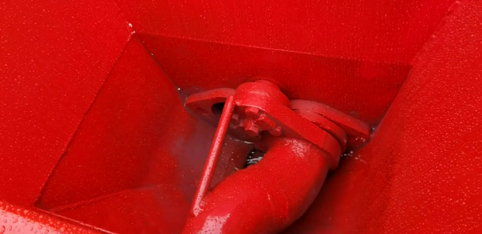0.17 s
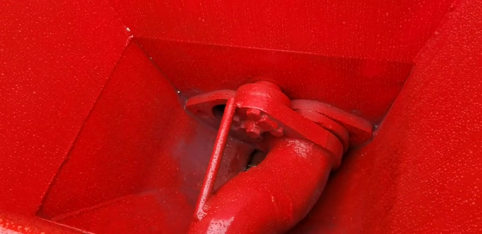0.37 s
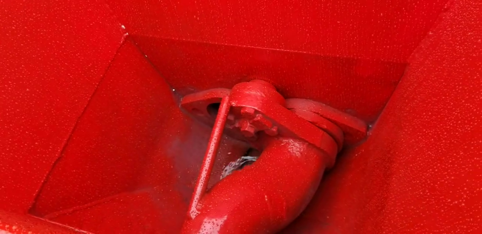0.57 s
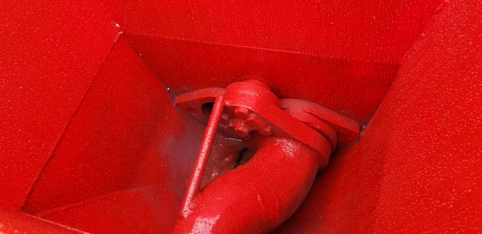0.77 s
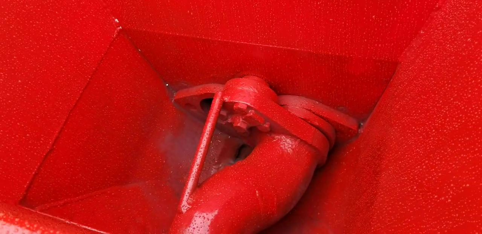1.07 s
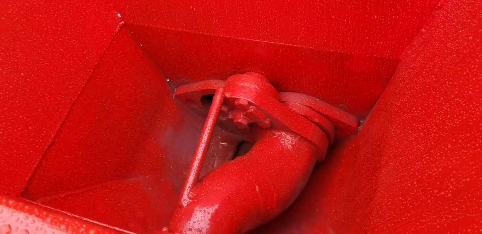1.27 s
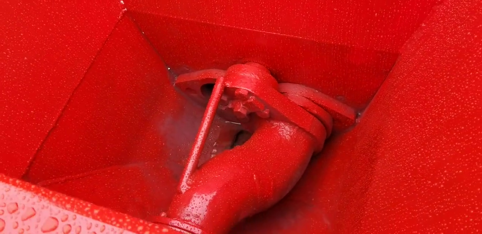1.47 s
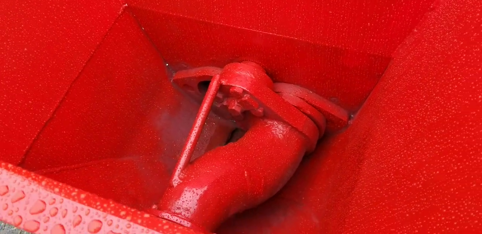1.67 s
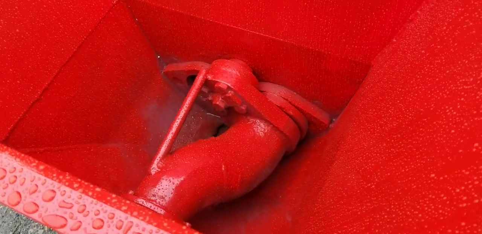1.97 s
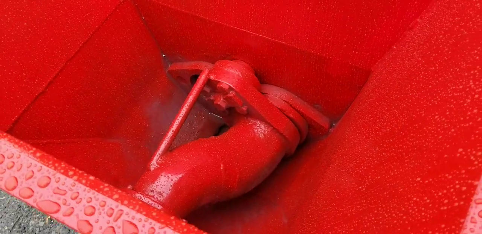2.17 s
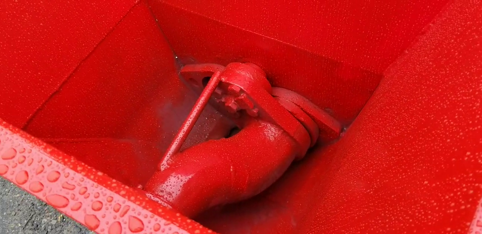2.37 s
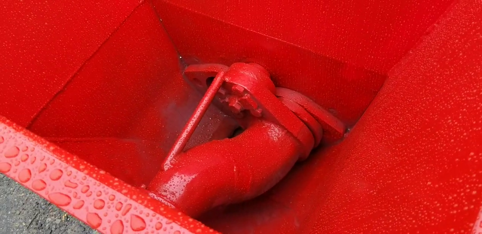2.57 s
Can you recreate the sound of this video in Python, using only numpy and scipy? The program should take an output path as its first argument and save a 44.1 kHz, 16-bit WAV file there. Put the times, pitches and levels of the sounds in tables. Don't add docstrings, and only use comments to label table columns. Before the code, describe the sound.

Close stereo sound of a concrete pump outdoors: a flurry of steel knocks and scrapes ends in a heavy clank at once, hydraulic whine swells briefly, and the engine throbs on steadily with loose metal rattling.

```python
import sys
import numpy as np
from scipy import signal
from scipy.fft import rfft, irfft, next_fast_len
from scipy.io import wavfile
from scipy.ndimage import uniform_filter1d, map_coordinates

SR = 44100
rng = np.random.default_rng(int(sys.argv[2]) if len(sys.argv) > 2 else 0)


def master_out(mix):
    frames = np.transpose(np.atleast_2d(mix))
    ceiling = np.clip(frames, -1, 1)
    pcm = np.round(ceiling * 32767).astype(np.int16)
    wavfile.write(sys.argv[1], SR, pcm)


def to_linear_factor(level_db):
    exponent = np.asarray(level_db, float) / 20
    return 10 ** exponent


N = 119952
TIME = np.arange(N) / SR

CONTACT_TIMES = [.001, .011, .020, .036, .058, .0992, .114, .125, .168, .177, .1952, .202]
# [ring level/dB, scrape level/dB, scrape length/s, dull share 0-1]
CONTACTS = [(-24.5, -53.5, 0.011, 0.3), (-27.5, -67.5, 0.011, 0.7), (-26, -52.5, .01, .8),
            (-28.5, -59.5, 0.011, 0.7), (-36, -65, 0.0082, 0.5), (-34, -30, 0.02, 0), (-25, -46, 0.036, .6),
            (-40, -46, 0.023, 0.3), (-43, -46, 0.022, 0.7), (-24.5, -37, 0.03, 1), (-45, -34.5, 0.013, 1),
            (-30.5, -38.5, 0.017, 1)]
# [f/Hz, level/dB, time to fall 60 dB/s]
PIPE_MODES = [(450, -2, .07), (640, -12, .05), (890, -4, .05), (1000, -1, .05), (1150, -7, .05),
              (1500, -12, .04), (2100, -14, .03)]
# [f/Hz, level/dB per Hz]
BRIGHT_SCRAPE = [(800, -6), (2000, -3), (3300, -8), (4400, 0), (6300, -2), (9000, -6), (13000, -16),
                 (16000, -22)]
DULL_SCRAPE = [(800, -19.5), (2000, -0.5), (3700, -5), (5400, -4), (7400, -5), (8500, -10), (12000, -21.5),
               (16000, -33.5)]
# [f/Hz, level/dB, time to fall 60 dB/s, left-right level/dB, left lead/rad]
LIP_MODES = [(456, -32, 0.065, 4, -4.8), (1110, -33.5, 0.064, 10, 1.5), (1486, -31.5, 0.048, 3, 0),
             (2140, -32, 0.037, -3, -2), (2890, -34, .04, -4, 3.5), (4400, -43.5, 0.046, 0, -1.5),
             (5330, -41, 0.068, 5, 0.5), (6160, -39, 0.054, 1, -1)]
SEAT_MODES = [(806, -22, .06, 13, -0.6), (972, -26.5, 0.05, 6, 0.52), (842, -38.5, 0.51, 10.5, .1),
              (435, -30.5, 0.038, 4, 0.9), (1658, -37.5, 0.2, 5, 1.5), (4700, -35.5, 0.042, 6, 0.3),
              (5390, -42, .04, 0, -.6), (4120, -37, 0.062, 2, 1), (3400, -37, 0.022, 3, -0.74),
              (2830, -37.5, 0.05, -4, -0.86)]
CLANK_MODES = [(2280, -20, 0.03, 3.5, -0.31), (2453, -34.5, .06, -10, -0.78), (869, -25, .07, 9.5, 0.23),
               (3653, -36, .06, 4, .5), (5860, -51, .06, -1, .5)]
# [f/Hz, level/dB, time to fall 60 dB/s]
BOOM_MODES = [(110.7, -19, 1.8), (130, -19.5, .8), (199, -34, 2), (300, -37, 3), (420, -36, .5),
              (740, -39, .6), (895, -34, .4), (1050, -35, .45)]
# [f/Hz, level/dB per Hz]
GRIND_COLOUR = [(80, -28.5), (200, 0.5), (500, -12), (1000, -8), (1800, -13), (3500, -28.5), (7000, -33.5),
                (16000, -44.5)]
HISS_COLOUR = [(2000, -39), (4500, -1), (6300, -1.5), (9000, -3.5), (13000, -8), (16000, -4)]
# [t/s, shaft speed f/Hz, level/dB]
ENGINE = [(0.0, 36.73, -19), (0.12, 37.98, -23.5), (0.18, 38.5, -16), (0.24, 38.77, -15.5),
          (0.3, 38.6, -14.5), (0.36, 38.28, -15.5), (0.42, 38.24, -15.5), (0.48, 38.43, -15.5),
          (0.54, 38.83, -14), (0.6, 38.65, -14), (0.72, 38.93, -13), (0.84, 39.08, -13), (1.08, 38.89, -14),
          (1.44, 39.1, -14), (1.8, 38.9, -14.5), (2.04, 38.95, -15), (2.34, 39.03, -15), (2.72, 39, -15)]
# [t/s, level/dB, lead/turns]
WALL_DRUM = [(0, -29.5, 0.014), (.25, -30.5, 0.26), (.42, -28.5, 0.074), (.6, -33, 0.26), (.85, -34, 0.37),
             (1.05, -33.5, 0.38), (1.4, -28.5, 0.34), (1.6, -21.5, 0.18), (1.68, -26, 0.034),
             (1.76, -37.5, .05), (1.95, -41, 0.19), (2.3, -38.5, 0.36), (2.72, -37, .35)]
# [t/s, level/dB]
GEAR_WHINE = [(0, -57), (.17, -48), (.21, -38.5), (.25, -28), (.31, -28.5), (.37, -27), (.44, -20.5),
              (.53, -24), (.62, -25.5), (.69, -38), (.78, -34.5), (1.14, -38.5), (1.44, -36.5),
              (1.58, -39.5), (1.75, -36), (2.05, -40), (2.2, -45.5), (2.72, -45)]
# [t/s, lead/turns]
GEAR_SLIP = [
    (.25, .47),
    (.39, .08),
    (.68, .56),
    (2.72, .7),
]
# [multiple, level/dB, left-right level/dB]
SHAFT_TONES = [(1.17, -52, 1), (5.49, -58, 1), (6.49, -52, 1), (7.49, -60, 1), (8, -56, -1), (8.5, -59, 0),
               (9, -57, 3), (10, -51, 1), (12, -53, -1), (13, -55, 0), (15, -59, -7), (19, -62, 4),
               (21, -69, 2), (22, -61, 5), (22.62, -67, 7), (23, -68, 7), (25.5, -69, 6), (26, -67, -1),
               (27, -61, 0), (29.78, -66, 6), (30, -67, 10), (33, -67, -2), (34, -55, 5), (36, -63, 10),
               (39, -66, 0), (40, -65, 0), (43, -66, 0), (55, -69, 0), (66, -71, 0)]
# [multiple, level/dB]
PISTON_TONES = [(1, -47), (2, -62), (3, -60)]
# [t/s, level over the clatter/dB]
RATTLES = [(0.286, 1.5), (.43, 6), (0.509, 9.5), (0.631, 13), (0.719, 6.5), (.93, 2.5), (1.09, 4),
           (1.199, 6.5), (1.264, 1.5), (1.338, 8.5), (1.446, 2), (1.585, 0.5), (1.659, -2.5), (1.864, -1),
           (2.085, 9.5), (2.241, 5.5), (2.37, 5.5), (2.545, 9), (2.693, 10)]
# [f/Hz, level/dB per Hz]
CLATTER_COLOUR = [(700, -43), (1500, 3.5), (2300, 0), (2800, -10.5), (3250, -3), (4000, -16.5),
                  (7500, -23.5), (16000, -54.5)]
TICK_COLOUR = [(9000, -60), (10600, -3.5), (11800, 2), (13000, -5.5), (14500, -50)]
LOW_RUSH = [(15, -15), (30, -2), (55, -4), (110, 1), (190, -9.5), (320, -10.5), (520, -10.5), (800, -20),
            (1600, -65)]
HIGH_RUSH = [(300, -44.5), (650, -3.5), (950, -2), (1500, 2.5), (2200, -2), (3200, -12.5), (4500, -18.5),
             (8000, -24), (16000, -34)]
# [f/Hz, likeness -1 to 1]
ALIKE = [(60, .99), (180, .95), (500, .75), (950, 0), (1700, -.1), (4500, -.1), (9000, .2)]
# [f/Hz, left-right level/dB]
LEAN = [(30, 3), (120, -3), (250, 0), (600, 4), (1200, 5.5), (2500, -4), (5000, 2.5), (12000, -2.5)]
# [f/Hz, level/dB]
MIC_COLOUR = [(6500, 0), (8200, -4.5), (9500, -7), (11800, 3), (13500, 0.5), (16000, 2)]

EVEN_DB = .6
FADE = to_linear_factor(-.8 * TIME)


def swing_pipe():
    ring = pipe_knocks()
    slam = pipe_slam()
    out = slam + ring * sides(5.4) + to_linear_factor(-8) * room(ring + slam)
    return out + scrapes() + hopper_boom() * sides(2.9) + grinding() + dust_hiss()


def pipe_knocks():
    out = np.zeros(N)
    t = TIME[:SR // 4]
    for start, (ring_db, _, _, _) in zip(CONTACT_TIMES, CONTACTS):
        modes = np.zeros(len(t))
        for hz, db, t60 in PIPE_MODES:
            level = to_linear_factor(ring_db + db + rng.normal(0, 0.83) - 60 * t / t60)
            modes += level * np.sin(2 * np.pi * hz * (1 + rng.normal(0, 0.024)) * t)
        i = round(start * SR)
        out[i:i + len(t)] += modes * np.minimum(t / 0.0016, 1)
    return out


def pipe_slam():
    out = np.zeros((2, N))
    t = TIME[:SR // 4]
    blows = [(.0992, LIP_MODES, 0), (.1955, SEAT_MODES, 0), (.2015, CLANK_MODES, 0), (.2175, CLANK_MODES, -13)]
    for start, body, gain_db in blows:
        modes = np.zeros((2, len(t)))
        for hz, db, t60, pan_db, lead in body:
            modes += tone(hz * t - 1 / 4, gain_db + db - 1.5 - 60 * t / t60, pan_db, -lead)
        i = round(start * SR)
        out[:, i:i + len(t)] += modes * np.minimum(t / .0015, 1)
    return out


def scrapes():
    bright, dull = np.zeros(N), np.zeros(N)
    t = TIME[:SR // 4]
    for start, (_, scrape_db, length, dull_share) in zip(CONTACT_TIMES, CONTACTS):
        burst = to_linear_factor(scrape_db - 20 * (t / length) ** 1.7) * np.minimum(t / 0.00094, 1)
        i = round(start * SR)
        bright[i:i + len(t)] += (1 - dull_share) * burst
        dull[i:i + len(t)] += dull_share * burst
    still = np.ones(N)
    return bright * rush(BRIGHT_SCRAPE, still, EVEN_DB) + dull * rush(DULL_SCRAPE, still, 0.0)


def hopper_boom():
    strike_s, seated_s = -.0414, .21
    boom = np.zeros(N)
    for hz, db, t60 in BOOM_MODES:
        boom += to_linear_factor(db - 60 * TIME / t60 + wobble(23)) * np.sin(2 * np.pi * hz * (TIME - strike_s))
    return boom * to_linear_factor(-60 * np.maximum(TIME - seated_s, 0) / 0.26)


def grinding():
    end_s, t60 = .21, 1
    slide_db = -30.5 - 33 * np.minimum(TIME, end_s)
    fall_db = 60 * np.maximum(TIME - end_s, 0) / t60
    return to_linear_factor(slide_db - fall_db + 2.7 * wobble(83)) * rush(GRIND_COLOUR, np.ones(N), EVEN_DB)


def dust_hiss():
    return to_linear_factor(-54 - 60 * TIME / 1.4) * rush(HISS_COLOUR, np.ones(N), EVEN_DB)


def room(sound):
    t60 = .13
    tail = rng.standard_normal((2, SR // 4)) * to_linear_factor(-60 * TIME[:SR // 4] / t60)
    return signal.fftconvolve(sound, tail / np.linalg.norm(tail[0]), axes=1)[:, :N]


def engine():
    speed, fire_db = curves(ENGINE)
    turn = np.cumsum(speed) / SR + 0.1889
    beat = 1 + 0.096 * np.cos(4 * np.pi * turn) + 0.064 * np.cos(2 * np.pi * turn)
    out = firing(turn, fire_db) + gear_whine(turn) + shaft_tones(turn) + piston_pump(turn)
    return out + clatter(beat) + injector_ticks(turn) + fan_rush(beat)


def firing(turn, fire_db):
    out = tone(2 * turn, fire_db + 0.056 * wobble(30), 3.25, .055)
    drum_db, lead = curves(WALL_DRUM)
    out += tone(4 * turn + lead, drum_db + 0.2 * wobble(21), 2.5, .1)
    third_db = -39.5 + 6.5 * np.exp(-(TIME / 0.25) ** 2) + 0.35 * wobble(4.5)
    return out + tone(6 * turn + .5 + 0.013 * wobble(3.5), third_db, -.4, 0.36)


def gear_whine(turn):
    gear = 11 * turn + curves(GEAR_SLIP)[0] + 0.025 * wobble(3.4)
    db = curves(GEAR_WHINE)[0] + 0.3 * wobble(17)
    return tone(gear, db, 3.5, .2) + tone(2 * gear, db - 30, 3.5, .3)


def shaft_tones(turn):
    out = np.zeros((2, N))
    for k, db, pan_db in SHAFT_TONES:
        phase = k * turn + rng.random() + 0.0031 * k * wobble(7.1)
        out += tone(phase, db + 0.5 + 1.5 * np.tanh(wobble(5.26)), pan_db, 0.03 * k)
    return out


def piston_pump(turn):
    out = np.zeros((2, N))
    for k, db in PISTON_TONES:
        phase = k * 7.145 * turn + rng.random() + 0.063 * wobble(6.8)
        out += tone(phase, db + 0.76 * wobble(1.6), 3, 0.24)
    return out


def clatter(beat):
    gain = beat * rattles() * to_linear_factor(1.2 * wobble(22) + 1.4 * wobble(70))
    return FADE * to_linear_factor(-49.5) * rush(CLATTER_COLOUR, gain, -1.5)


def rattles():
    rise_s, t60 = 0.0041, .15
    table = np.array(RATTLES)
    since = np.maximum(TIME - table[:, :1], 0)
    swells = to_linear_factor(table[:, 1:] - 60 * since / t60) * np.minimum(since / rise_s, 1)
    return 1 + np.sum(swells, axis=0)


def injector_ticks(turn):
    ticks = np.exp(2.5 * (np.cos(4 * np.pi * turn) - 1)) * to_linear_factor(3 * wobble(45))
    return to_linear_factor(-88.5 + 5 * TIME) * rush(TICK_COLOUR, ticks / ticks.std(), 4.0)


def fan_rush(beat):
    low = to_linear_factor(-39.5 + 6 * np.exp(-TIME / 0.3)) * rush(LOW_RUSH, to_linear_factor(.8 * wobble(3.2)), EVEN_DB)
    return low + FADE * to_linear_factor(-43.5) * rush(HIGH_RUSH, beat * to_linear_factor(.3 * wobble(2.4)), 1.97)


def rush(colour, gain, patchy_db):
    z = signal.stft(rng.standard_normal((2, N)) * gain, nperseg=512)[2]
    field = uniform_filter1d(rng.standard_normal(z.shape[1:]), size=6, axis=0)
    field = uniform_filter1d(field, size=8, axis=1)
    pair = signal.istft(z * to_linear_factor(patchy_db * field / field.std()), nperseg=512)[1][:, :N]
    m = next_fast_len(N + 8192)
    hz = np.fft.rfftfreq(m, 1 / SR)
    angle = np.arccos(np.clip(along(ALIKE, hz), -1, 1)) / 2
    mid, side = rfft(pair, m) * to_linear_factor(along(colour, hz)) * [np.cos(angle), np.sin(angle)]
    both = irfft(np.array([mid + side, mid - side]) * sides(along(LEAN, hz)), m)[:, :N]
    return both / np.sqrt(np.mean(both ** 2) / np.mean(gain ** 2))


def tone(turns, db, pan_db, lag=0):
    angle = 2 * np.pi * turns - np.array([[.5], [-.5]]) * lag
    return np.sqrt(2) * to_linear_factor(db) * sides(pan_db) * np.cos(angle)


def sides(pan_db):
    return to_linear_factor(np.array([[.5], [-.5]]) * pan_db)


def wobble(rate):
    knots = rng.standard_normal(int(N * 200 / SR) + 4)
    return map_coordinates(knots, [TIME * rate])


def curves(rows):
    s, *cols = np.transpose(rows)
    return [uniform_filter1d(np.interp(TIME, s, c), size=1500, mode="nearest") for c in cols]


def along(points, hz):
    f, v = np.transpose(points)
    return np.interp(np.log(hz + 1), np.log(f + 1), v)


def scene():
    return swing_pipe() + engine()


def roll_off(x):
    return signal.sosfilt(signal.butter(12, 15830, fs=SR, output="sos"), x)


def record(dry):
    m = next_fast_len(N + 8192)
    colour = to_linear_factor(along(MIC_COLOUR, np.fft.rfftfreq(m, 1 / SR)))
    heard = irfft(rfft(dry, m) * colour, m)[:, :N]
    return roll_off(heard)


dry = scene()
out = record(dry)
master_out(out)
```